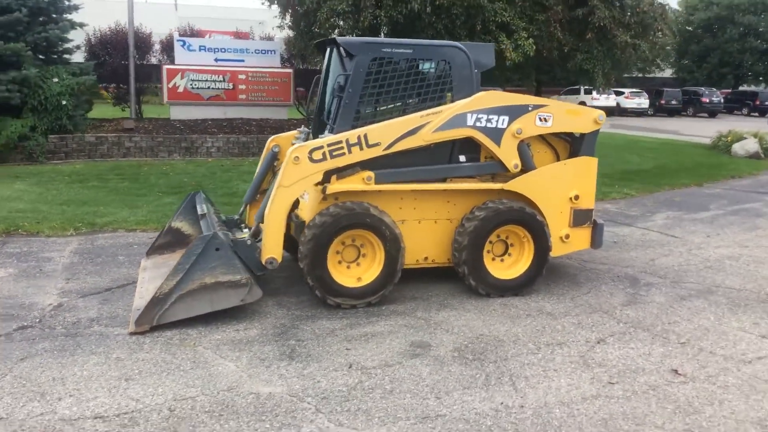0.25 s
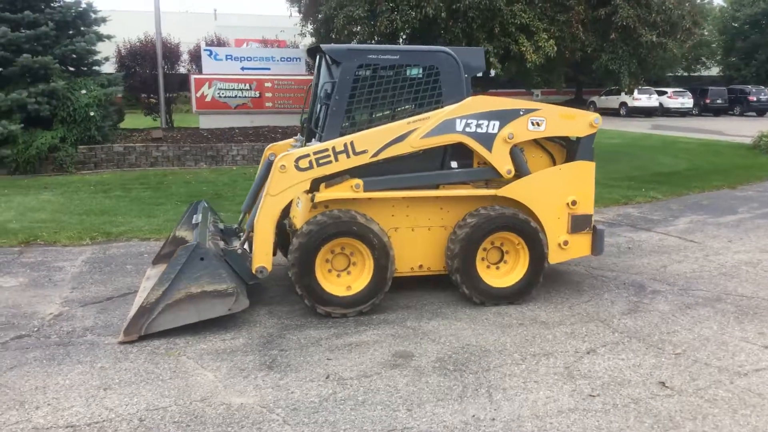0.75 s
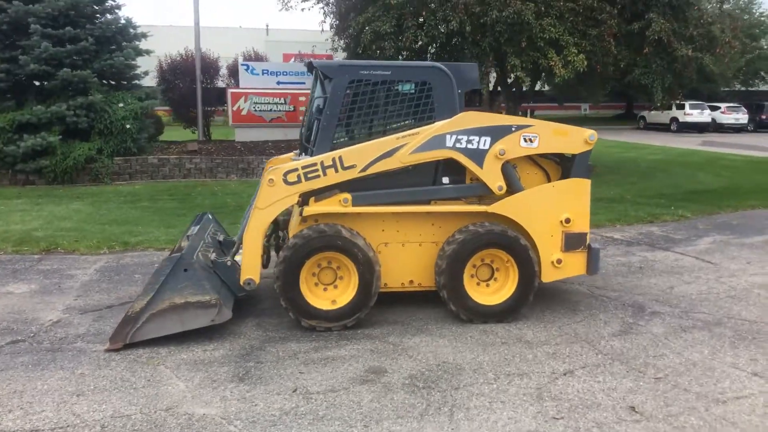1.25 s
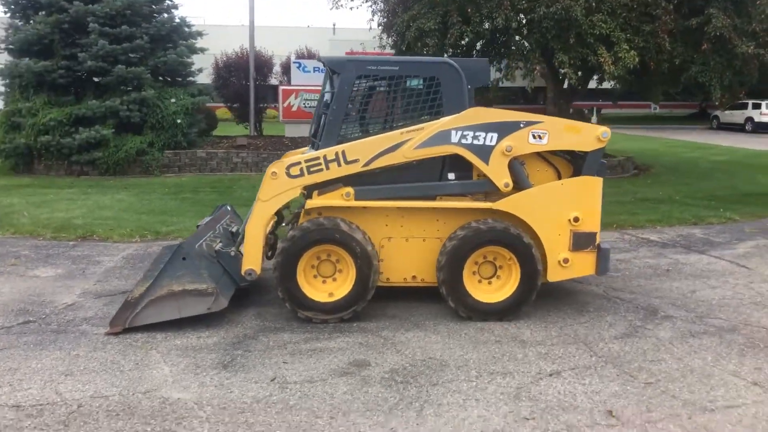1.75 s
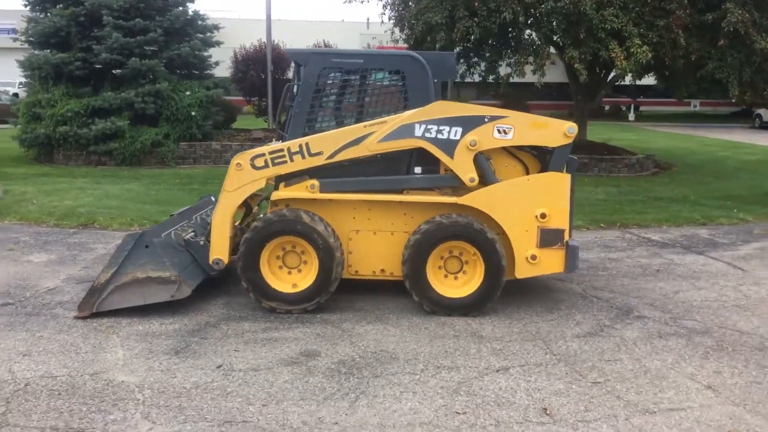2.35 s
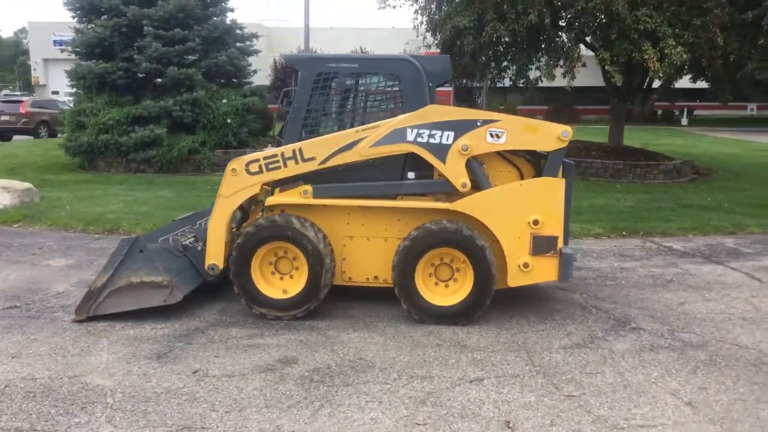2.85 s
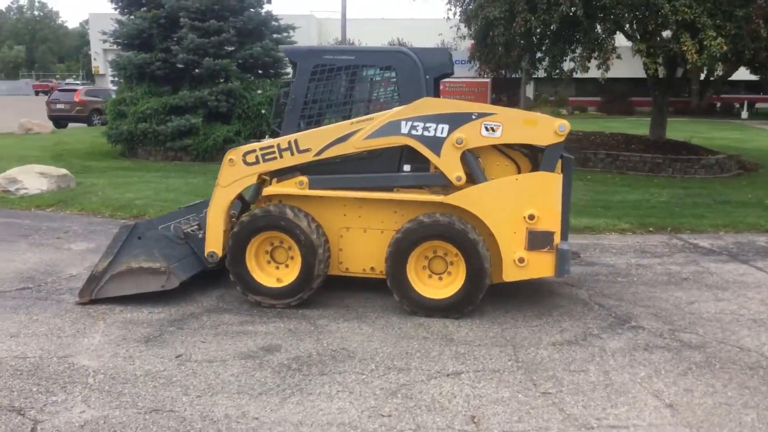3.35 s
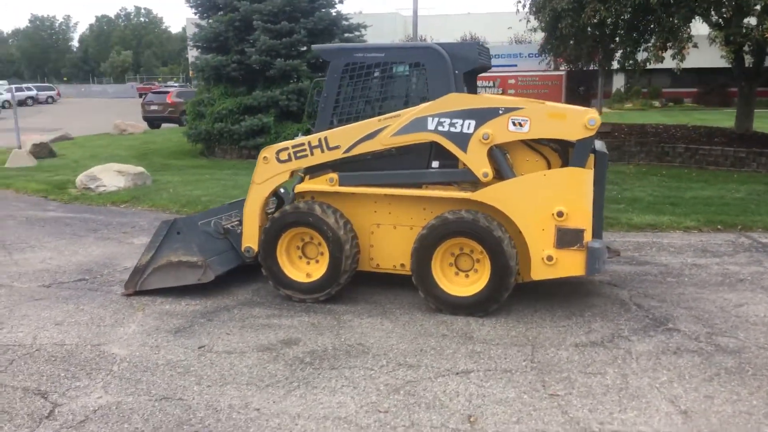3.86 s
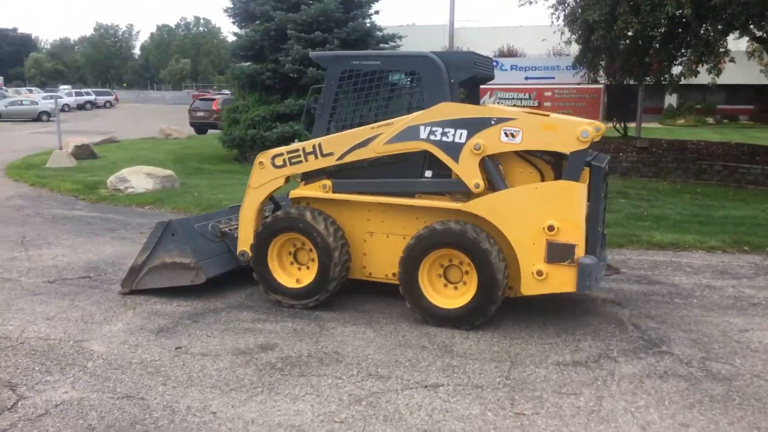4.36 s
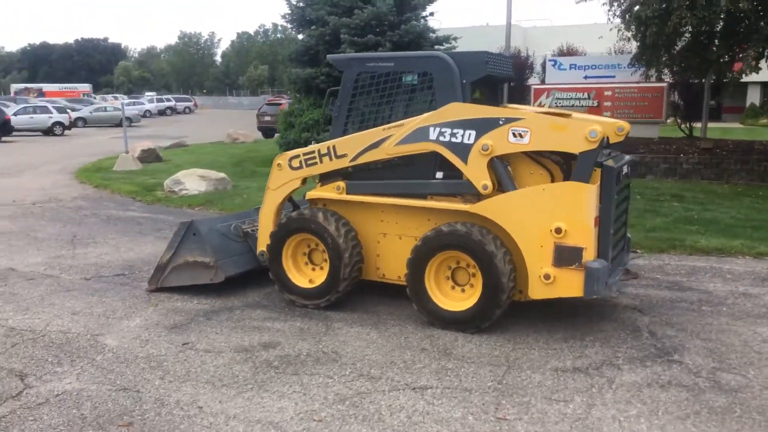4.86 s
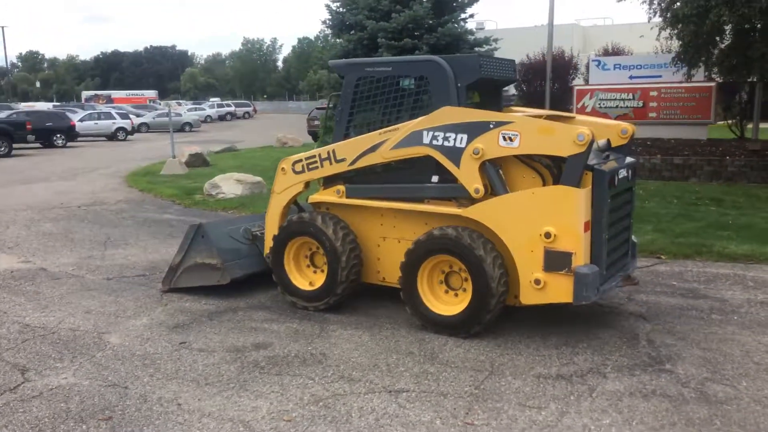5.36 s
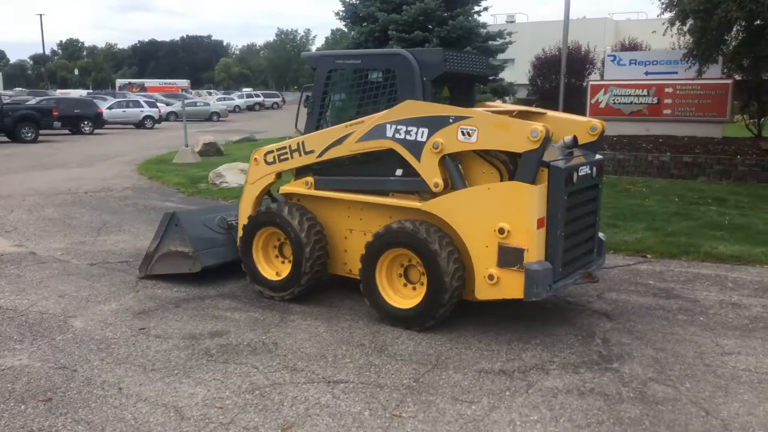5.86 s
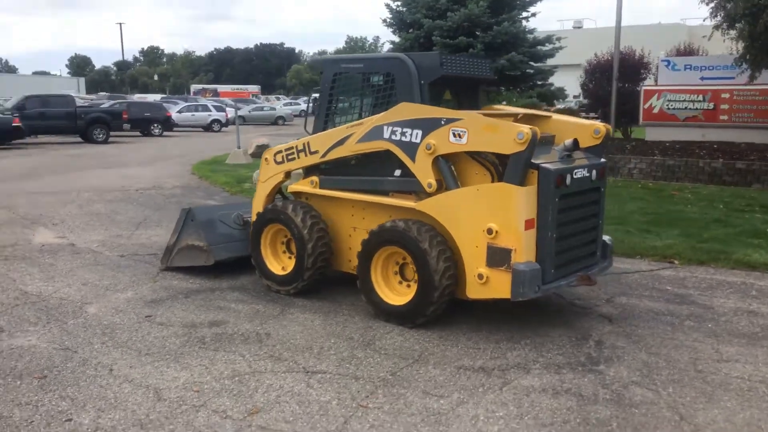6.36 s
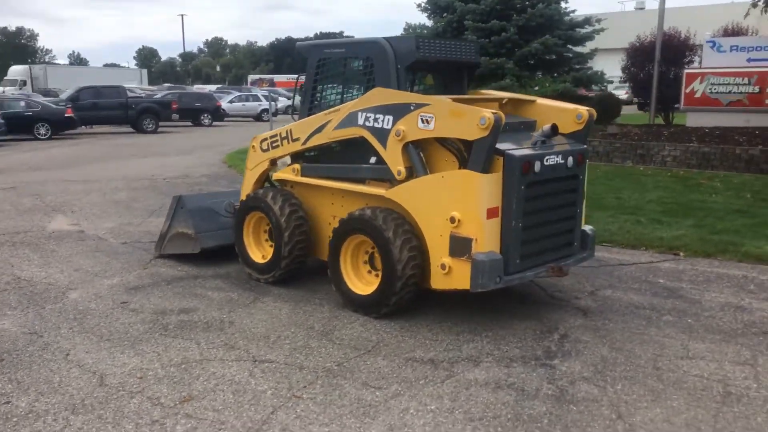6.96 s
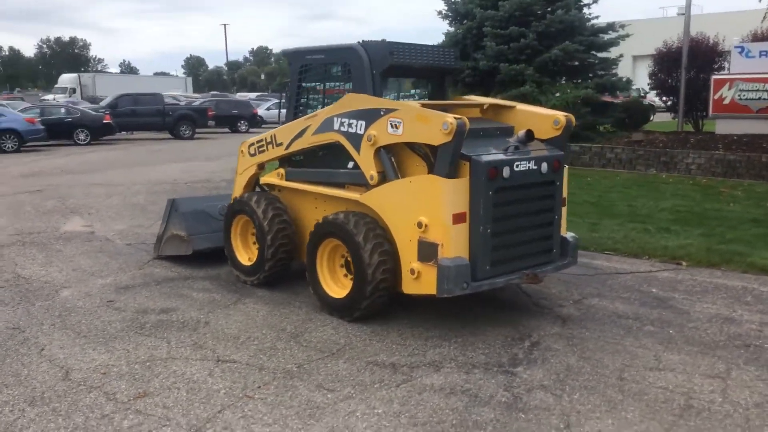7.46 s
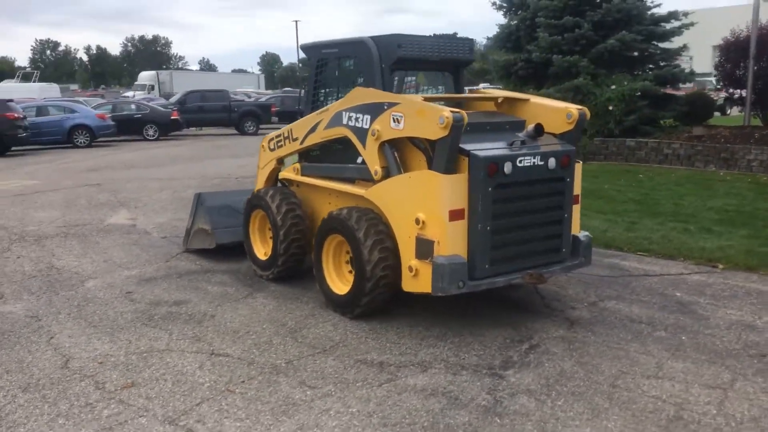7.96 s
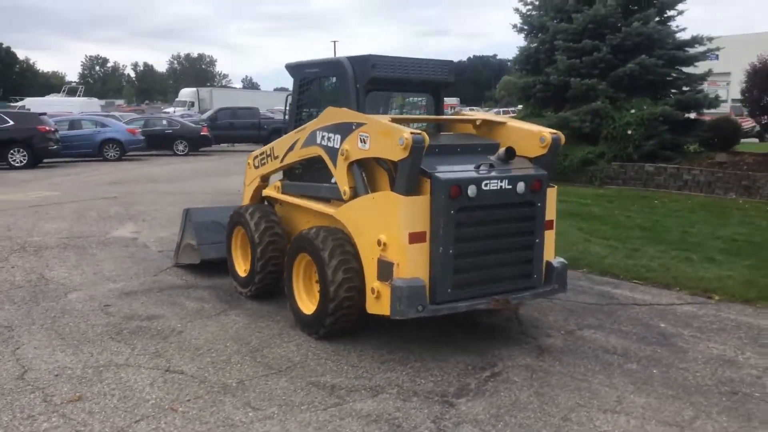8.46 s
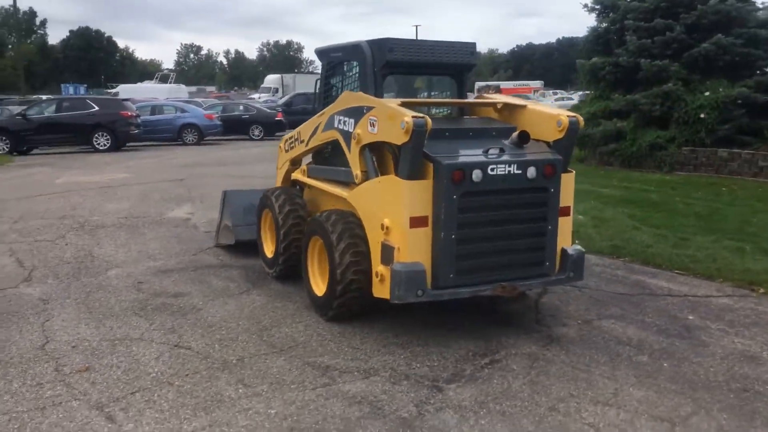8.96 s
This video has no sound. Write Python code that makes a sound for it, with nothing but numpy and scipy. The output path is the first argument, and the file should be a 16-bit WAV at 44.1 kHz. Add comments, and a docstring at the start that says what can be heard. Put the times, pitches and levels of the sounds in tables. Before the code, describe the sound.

Steady diesel loader engine running outside, growing brighter and hissier, interrupted by several short microphone handling thumps and clicks.

```python
"""A four-cylinder diesel skid steer runs at steady speed on an open lot. Its firings drive an exhaust
drone, humming panels, block clatter, ticking covers and grille hiss; the cooling fan adds a blade tone.
A handheld camera walks from the bucket round to the rear grille, so the balance shifts.
The hand bumps the camera a few times; the hardest bumps saturate and duck the gain."""
import sys
import numpy as np
from scipy import signal
from scipy.fft import rfft, irfft, next_fast_len
from scipy.io import wavfile
from scipy.ndimage import uniform_filter1d, minimum_filter1d, map_coordinates

SR = 44100
rng = np.random.default_rng(int(sys.argv[2]) if len(sys.argv) > 2 else 0)


def master_out(mix):
    """Clip the mix to full scale and print it as 16-bit PCM to the path in sys.argv[1]."""
    frames = np.transpose(np.atleast_2d(mix))
    ceiling = np.clip(frames, -1, 1)
    pcm = np.round(ceiling * 32767).astype(np.int16)
    wavfile.write(sys.argv[1], SR, pcm)


N = 405719
FIRING_HZ, HUNT_HZ = 50.79, 0.025  # firing rate, governor drift


def amp(db):
    """Decibels to gain."""
    return np.exp(np.asarray(db) * np.log(10) / 20)


def unit(x):
    """Scale to rms 1."""
    return x / np.sqrt(np.mean(x ** 2) + 1e-20)


def curve(rows):
    """(time [s], value) rows to one value per sample."""
    return np.interp(np.arange(N) / SR, *np.transpose(rows))


def wobble(rate_hz):
    """Smooth random curve through knots at rate_hz."""
    knots = rng.standard_normal(int(N * rate_hz / SR) + 4)
    coarse = np.linspace(0, N, 4096)
    return np.interp(np.arange(N), coarse, map_coordinates(knots, [coarse * rate_hz / SR]))


def filtered(x, response):
    """Apply a complex frequency response."""
    size = next_fast_len(len(x) + SR // 10)
    return irfft(rfft(x, size) * response(np.fft.rfftfreq(size, 1 / SR)), size)[:len(x)]


def coloured(x, spectrum):
    """Shape x by (frequency [Hz], level [dB]) rows, rolled off past the ends; rms 1."""
    points_hz, db = np.transpose(spectrum)
    log_hz = np.log(np.r_[points_hz[0] / 2, points_hz, points_hz[-1] * 2])
    db = np.r_[db[0] - 20, db, db[-1] - 20]
    return unit(filtered(x, lambda hz: amp(np.interp(np.log(hz + 1), log_hz, db, right=-120))))


def resonance(hz, centre_hz, width_hz):
    """Causal response of one mode."""
    return 1j * hz * width_hz / (centre_hz ** 2 - hz ** 2 + 1j * hz * width_hz)


def add(track, at_s, sound):
    """Mix a sound in at at_s."""
    part = track[round(at_s * SR):][:len(sound)]
    part += sound[:len(part)]


def facing(beside_db, behind_db):
    """Gain along the walk from beside the machine to behind it."""
    # (time [s], grille faces camera [0-1])
    walk = [(0, 0.02), (3.1, 0.11), (4.5, 0.33), (5.8, 0.67), (7, 0.84), (9.2, 0.95)]
    return amp(beside_db + (behind_db - beside_db) * curve(walk))


def passing(at_s, reach_s):
    """Gain of a part that faces the camera at at_s, then turns away."""
    return np.exp(-0.5 * ((np.arange(N) / SR - at_s) / reach_s) ** 2)


def standing_wave(order):
    """Gain of an engine tone along the walk where it meets its own echo."""
    # tone of each node (order [x firing rate])
    node_orders = [2, 3, 3, 4, 4, 10, 11.5, 13, 14, 15, 23]
    # (time [s], gain at centre [dB], half width [s])
    nodes = [(5, -24, 3.9), (-1, -20, 2.26), (11, -2.5, 1.6), (4.5, -10, 0.99), (8.5, -9, 1.2),
             (6, -32, 1.7), (6, -14, 0.96), (-4, 7.5, 0.69), (1.05, -22, 2.6), (6, -25, 1.4),
             (3.5, -17, 1.4)]
    gain, t = 1, np.arange(N) / SR
    for node_order, (at_s, centre_db, width_s) in zip(node_orders, nodes):
        if node_order == order:
            away = ((t - at_s) / width_s) ** 2
            gain = gain * np.sqrt((away + amp(centre_db) ** 2) / (away + 1))
    return gain


def reflections(x, depth_db, width_hz, span_s):
    """Ground and bodywork echoes carve peaks and dips that drift as the camera moves."""
    hz, t, spectra = signal.stft(x, SR, nperseg=1024)
    ripple = rng.standard_normal(spectra.shape)
    for _ in range(2):
        ripple = uniform_filter1d(ripple, max(1, round(width_hz / hz[1])), axis=0)
        ripple = uniform_filter1d(ripple, max(1, round(span_s / t[1])), axis=1)
    _, echoed = signal.istft(spectra * amp(depth_db * unit(ripple)), SR, nperseg=1024)
    return unit(echoed[:N])


def rattle(firings, repeat, depth_db, views=6):
    """Impacts that swell with each firing; the share `repeat` recurs every four-firing cycle."""
    cycles = firings / 4
    period = int(N / cycles[-1])
    patterns = rng.standard_normal((views + 1, period))
    place = (cycles % 1 * period).astype(int)
    # the pattern changes as other engine parts face the camera
    view, blend = np.divmod(np.arange(N) * views / N, 1)
    view = view.astype(int)
    locked = np.sqrt(1 - blend) * patterns[view, place] + np.sqrt(blend) * patterns[view + 1, place]
    impacts = np.sqrt(repeat) * locked + np.sqrt(1 - repeat) * rng.standard_normal(N)
    swell = np.cos(2 * np.pi * firings) + 0.22 * np.cos(2 * np.pi * cycles)
    # valves and injectors strike between firings
    strikes = np.cos(6 * np.pi * firings) + np.cos(7 * np.pi * firings)
    return impacts * amp(depth_db * (swell + 0.38 * strikes))


def handling():
    """Hand bumps ring the camera case with a knock, a low boom and a rap; plus a few dry clicks."""
    # (time [s], level [dB], knock [Hz], knock rise [cycles], boom [dB re knock], rap [dB re knock])
    bumps = [(2.537, -16, 202, 0.65, -2, -30), (2.5504, -4, 226, 0.69, -4, -17),
             (2.575, -16, 190, 1, 2, -30), (2.594, -20, 200, 0.9, 7, -33),
             (2.7113, 6.5, 216, 0.55, -4.5, -10.5), (2.875, -18, 211, 0.9, -3, -45),
             (3.0002, -9, 215, 1.0, -4, -32), (5.9851, -4, 197, 0.85, -1, -23),
             (6.443, -21, 230, 1, 0, -42), (6.539, -25, 210, 0.9, 2, -30),
             (7.9223, -11, 215, 0.8, -5.5, -23), (8.034, -15, 221, 0.9, -13, -12),
             (8.207, -17.5, 210, 0.9, 1, -3), (8.2508, -11, 202, 0.86, 0.5, -7),
             (8.304, -16, 200, 0.72, -3, -25)]
    # boom and rap modes (frequency [Hz], rise [s])
    case_modes = [(87, 0.011), (563, 0.0015)]
    # (time [s], peak [dB], centre [Hz], width [Hz], decay [s])
    clicks = [(0.604, -22, 2000, 13000, 0.000056), (2.5487, -18.5, 700, 600, 0.0011),
              (2.7086, -17, 1740, 1100, 0.0008), (2.7085, -23, 2500, 1000, 0.00038),
              (2.7088, -24, 11400, 9000, 0.00035), (2.7095, -28, 840, 800, 0.0014),
              (2.717, -9.5, 560, 600, 0.0017), (2.718, -29, 1200, 1000, 0.00085),
              (3.037, -40, 6500, 4000, .001), (8.0345, -29, 8700, 1800, 0.00061),
              (8.204, -32, 6800, 1500, 0.0016), (8.034, -16, 1060, 650, 0.0015),
              (8.25, -19, 1490, 1200, 0.002), (8.2525, -32, 7500, 3500, .001)]
    out, t = np.zeros(N), np.arange(SR // 8) / SR

    def ring(hz, rise_s):
        return (t / rise_s * np.exp(1 - t / rise_s)) ** 1.97 * np.sin(2 * np.pi * hz * t)

    boom, rap = [ring(hz, rise_s) for hz, rise_s in case_modes]
    for at_s, db, knock_hz, rise_cycles, boom_db, rap_db in bumps:
        knock = ring(knock_hz, rise_cycles / knock_hz)
        add(out, at_s, amp(db) * (knock - amp(boom_db) * boom + amp(rap_db) * rap))
    for at_s, db, centre_hz, width_hz, decay_s in clicks:
        burst = rng.standard_normal(len(t)) * np.exp(-t / decay_s)
        click = filtered(burst, lambda hz: resonance(hz, centre_hz, width_hz) ** 3)
        add(out, at_s, amp(db) * click / np.abs(click).max())
    return out


def fan(blade_hz, level_db):
    """The cooling fan's blade tone wavers and beats against the drone."""
    blade_passes = np.cumsum(blade_hz + 1.52 * wobble(4.2)) / SR
    return amp(level_db + 0.67 * wobble(2.4)) * np.sqrt(2) * np.sin(2 * np.pi * blade_passes)


def grille_hiss(firings):
    """Air hisses through the grille, pulsing slightly with the firings."""
    # (frequency [Hz], density [dB])
    spectrum = [(1500, -37), (3200, -5.5), (3550, -2), (3900, -1.5), (4350, -2), (4750, -2), (5600, -4.5),
                (6700, -7.5), (7650, -8), (8000, -12), (8400, -7), (10100, -13), (11800, -12),
                (14400, -22.5), (15700, -25)]
    # (time [s], level [dB])
    levels = [(0, -55), (1.5, -54.5), (3, -55.5), (4.2, -54.5), (5.3, -51.5), (6.4, -48), (7.5, -46.5),
              (9.2, -46)]
    hiss = coloured(rattle(firings, repeat=0.17, depth_db=0.9), spectrum)
    hiss = reflections(hiss, depth_db=1.4, width_hz=260, span_s=0.8)
    return amp(curve(levels) + 0.7 * wobble(9)) * hiss


def covers(firings, loose_db):
    """Injector ticks ring thin steel covers, which sit loosely and rattle unevenly."""
    # (centre [Hz], width [Hz], gain [dB])
    modes = [(2550, 73, -2.5), (3936, 63, 8), (4068, 29, 10.5), (4720, 38, -1), (4780, 42, -9),
             (7200, 98, -15), (9160, 150, -15)]
    # (time [s], level [dB])
    levels = [(0, -62), (1.9, -59), (3.1, -62), (4.6, -59), (5.4, -56), (6.15, -54.5), (6.4, -49),
              (7, -49.5), (7.5, -51.5), (8.4, -51.5), (8.85, -48), (9.2, -52)]
    ticks = rattle(firings, repeat=0.5, depth_db=1.5)
    ringing = filtered(ticks, lambda hz: sum(amp(db) * resonance(hz, *mode) for *mode, db in modes))
    ringing = reflections(unit(ringing), depth_db=-1.0, width_hz=130, span_s=0.3)
    return amp(curve(levels)) * unit(ringing * amp(loose_db * wobble(40)))


def bodywork(firings):
    """The engine shakes the bodywork; each part's resonance swells as the camera passes."""
    # (centre [Hz], width [Hz], loudest at [s], reach [s], level [dB])
    parts = [(338, 30, 3.3, 0.76, -48.5), (564, 150, 3.93, 0.85, -40.5), (750, 38, 2.4, 0.24, -41.5),
             (823, 270, 8.95, 0.91, -37.5), (986, 130, 8.25, 0.39, -39.5), (2600, 33, 0.95, 1.2, -60),
             (2560, 140, 1.64, 0.16, -58), (700, 97, 5.6, 0.76, -45), (4090, 68, 6.74, 0.084, -50),
             (4070, 63, 8.9, 0.22, -53), (2580, 130, 7.7, 2, -56)]
    shaking = rattle(firings, repeat=0.92, depth_db=0.0)
    out = np.zeros(N)
    for centre_hz, width_hz, at_s, reach_s, db in parts:
        ringing = filtered(shaking, lambda hz: resonance(hz, centre_hz, width_hz) ** 2)
        out += amp(db) * passing(at_s, reach_s) * unit(ringing)
    return out


def cylinder_knock(firings, scatter_db, slip_turns):
    """Metallic blows, once per cycle, never quite alike; the walk picks out different cylinders."""
    # (place in cycle [0-1], pitch [Hz], decay [s], loudest at [s], reach [s], level [dB])
    knocks = [(0.12, 680, 0.0012, 0.4, 0.9, -46), (0.82, 830, 0.0012, 0.9, 0.6, -49),
              (0.29, 1180, 0.0009, 0.1, 0.5, -48), (0.36, 1520, 0.001, 1.15, 0.55, -49.5),
              (0.4, 1370, 0.0009, 2.2, 0.6, -50), (0.9, 1120, 0.0008, 2.4, 1.3, -48),
              (0.32, 1350, 0.0009, 3.9, 0.4, -49), (0.54, 700, 0.0012, 5.0, 1.0, -43.5),
              (0.73, 770, 0.0012, 5.4, 0.5, -45), (0.06, 1480, 0.0007, 6.0, 1.0, -46),
              (0.87, 1550, 0.001, 5.5, 0.7, -48), (0.32, 1300, 0.0008, 7.6, 0.7, -45),
              (0.55, 1350, 0.0007, 8.8, 0.9, -43.5)]
    out = np.zeros(N)
    for place, hz, decay_s, at_s, reach_s, db in knocks:
        cycle, fraction = np.divmod(firings / 4 - place + 1, 1)
        age_s = fraction * 4 / FIRING_HZ
        per_cycle = rng.standard_normal((int(cycle[-1]) + 1, 2))
        force, shift = per_cycle[cycle.astype(int)].T
        envelope = amp(scatter_db * force) * age_s ** 2 * np.exp(-age_s / decay_s)
        blows = envelope * np.sin(2 * np.pi * (hz * age_s + slip_turns * shift))
        out += amp(db) * passing(at_s, reach_s) * unit(blows)
    return out


def panels(firings, wander_db):
    """Panels hum on multiples of the engine cycle; each tone comes and goes along the walk."""
    # (order [x firing rate])
    orders = [10.5, 11, 11.5, 13, 14, 15, 16.5, 17.75, 20, 20.25, 22, 23, 27]
    # per order (level beside [dB], level behind [dB])
    levels = [(-58, -66), (-54, -51), (-50.5, -44), (-49, -44), (-45, -40.5), (-52.5, -35), (-48.5, -46),
              (-54.5, -43.5), (-52, -48), (-51, -46), (-60, -42.5), (-51, -43), (-53.5, -43)]
    jittered = firings + 0.0031 * wobble(18)
    out = np.zeros(N)
    for order, sides_db in zip(orders, levels):
        tone = np.sqrt(2) * np.sin(2 * np.pi * (order * jittered + rng.random()))
        out += facing(*sides_db) * standing_wave(order) * amp(wander_db * wobble(1.523)) * tone
    return out


def block_clatter(firings):
    """Combustion clatters through the engine block."""
    # (frequency [Hz], density [dB])
    spectrum = [(250, -58), (420, -24), (470, -16), (525, -10), (680, -4.5), (880, -3.5), (1080, -1.5),
                (1400, -6), (1580, -8.5), (1900, -19.5), (2200, -19.5), (2550, -17), (2800, -20),
                (3200, -31), (5000, -37)]
    clatter = coloured(rattle(firings, repeat=0.45, depth_db=0.44), spectrum)
    clatter = reflections(clatter, depth_db=0.34, width_hz=130, span_s=0.94)
    return facing(beside_db=-39, behind_db=-30.5) * clatter


def exhaust(firings, flutter_db):
    """Firing pulses drone over a rough roar; their orders slip in phase as the path changes."""
    # exhaust and intake tones (order [x firing rate])
    orders = [1, 2, 3, 4, 10]
    # per order (level beside [dB], level behind [dB])
    levels = [(-35.2, -34.5), (-36.5, -30), (-31.5, -35), (-39.5, -37), (-53, -38.5)]
    # loudest tone, order 5, through its standing waves (time [s], level [dB])
    fifth_levels = [(0, -34), (0.6, -29), (1.3, -26.5), (1.8, -28), (2.4, -31.5), (3.1, -33), (3.9, -35),
                    (4.4, -32), (5, -29), (5.5, -33), (5.95, -36), (6.3, -47), (6.65, -39), (7.2, -30),
                    (7.7, -27), (8.3, -26), (9.2, -30)]
    # (frequency [Hz], density [dB])
    muffler = [(20, -33), (45, -2), (65, -3), (92, -1.5), (135, -1.5), (175, 1.5), (205, -7), (255, -4.5),
               (300, -12.5), (380, -18), (700, -26)]
    # (time [s], level [dB])
    roar_levels = [(0, -34.5), (2.4, -34), (3.7, -35.5), (5, -33), (6, -33.5), (7.2, -32), (8, -32),
                   (9.2, -31.5)]
    gains = {order: facing(*sides_db) * standing_wave(order) for order, sides_db in zip(orders, levels)}
    gains[5] = amp(curve(fifth_levels))
    drone = np.zeros(N)
    for order, gain in gains.items():
        flutter = amp(flutter_db * wobble(11))
        turns = order * firings + 0.23 * wobble(0.586)
        drone -= gain * flutter * np.sqrt(2) * np.cos(2 * np.pi * turns)
    roar = coloured(rattle(firings, repeat=0.26, depth_db=-3.0), muffler)
    return drone + amp(curve(roar_levels)) * roar


def scene():
    """Engine layers follow one crankshaft; fan and bumps are independent. Mono."""
    firings = np.cumsum(FIRING_HZ + HUNT_HZ * wobble(1)) / SR  # running count
    engine = exhaust(firings, flutter_db=0.5) + panels(firings, wander_db=2.15)
    engine += block_clatter(firings) + covers(firings, loose_db=1.8) + grille_hiss(firings)
    engine += bodywork(firings) + cylinder_knock(firings, scatter_db=1.0, slip_turns=0.17)
    return (engine + fan(blade_hz=161.6, level_db=-44.5) + handling())[None]


def gain_control(x, threshold_db, slope, hold_s, release_s):
    """Loud moments pull the gain down; it holds, then recovers."""
    level_db = 10 * np.log10(np.abs(uniform_filter1d(x ** 2, SR // 50)) + 1e-12)
    cut_db = -slope * np.maximum(level_db - threshold_db, 0)
    hold, release = int(hold_s * SR), int(release_s * SR)
    cut_db = minimum_filter1d(cut_db, hold, origin=(hold - 1) // 2)
    return x * amp(uniform_filter1d(cut_db, release, origin=(release - 1) // 2))


def record(dry):
    """Microphone bass cut, gain control, soft saturation at full scale, camera band limit."""
    bass_hz, top_hz = 26, 15750
    x = filtered(dry[0], lambda hz: hz ** 4 / (hz ** 4 + bass_hz ** 4))
    x = gain_control(x, threshold_db=-18.5, slope=0.19, hold_s=0.14, release_s=0.091)
    x = x / (1 + np.abs(x) ** 8) ** (1 / 8)
    return filtered(x, lambda hz: hz < top_hz)[None]


dry = scene()
out = record(dry)
master_out(out)
```